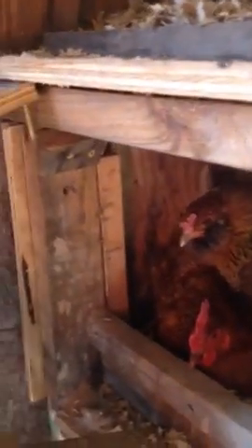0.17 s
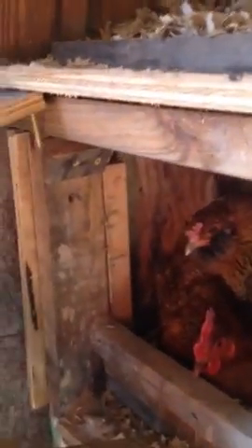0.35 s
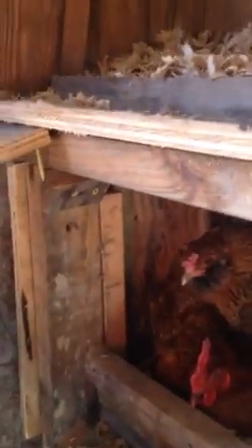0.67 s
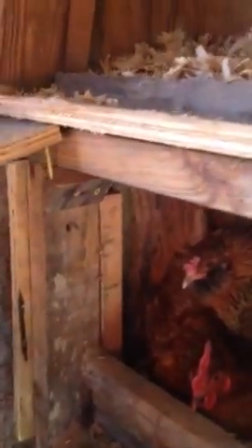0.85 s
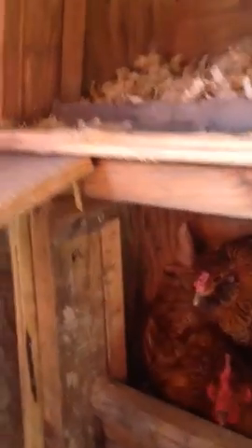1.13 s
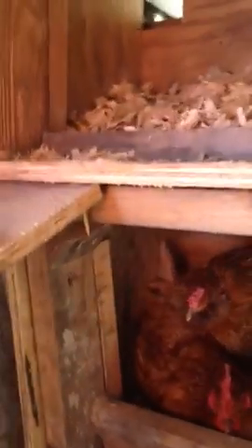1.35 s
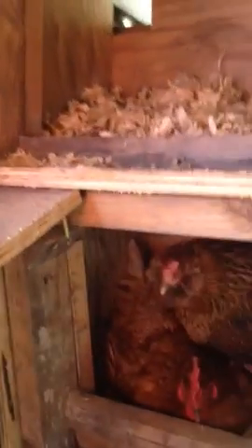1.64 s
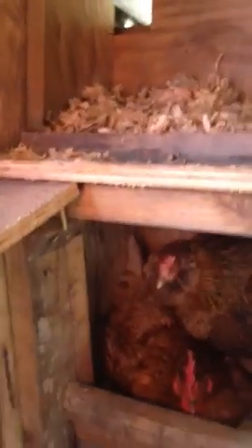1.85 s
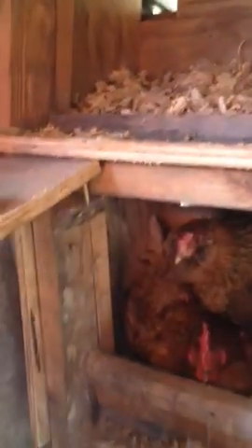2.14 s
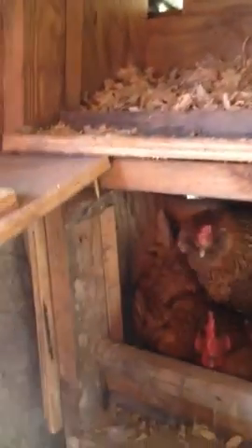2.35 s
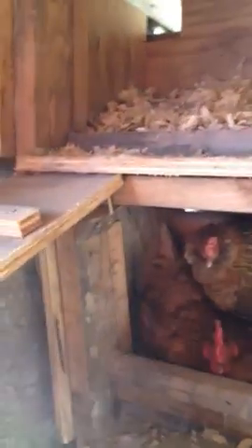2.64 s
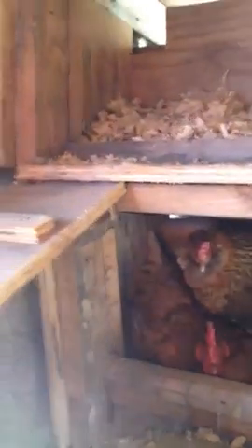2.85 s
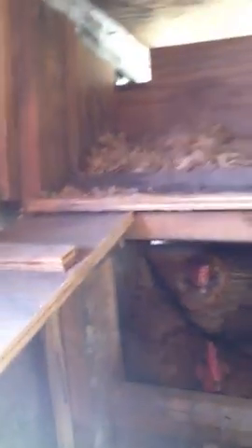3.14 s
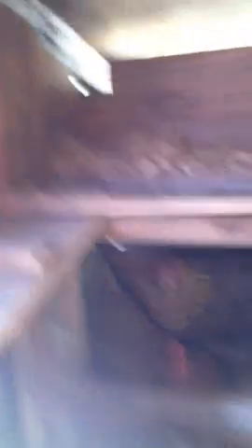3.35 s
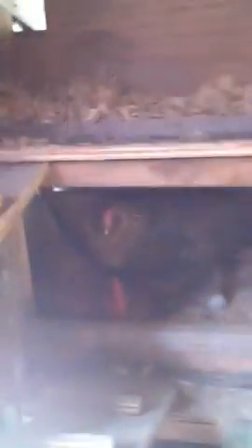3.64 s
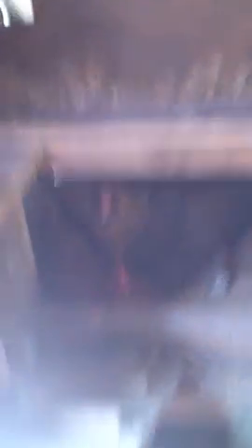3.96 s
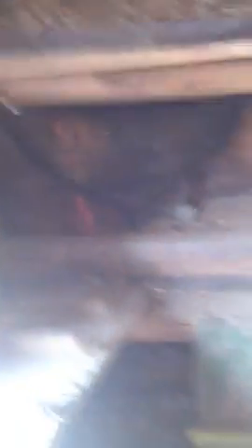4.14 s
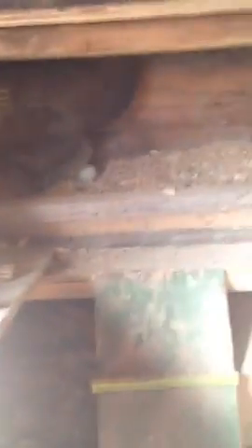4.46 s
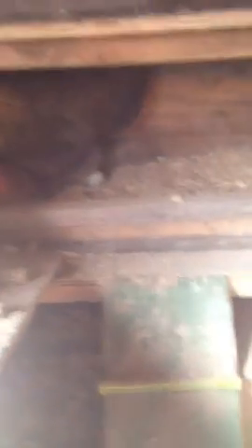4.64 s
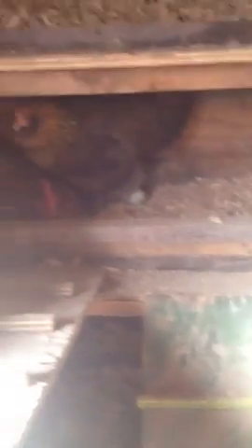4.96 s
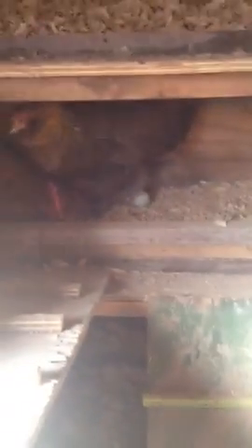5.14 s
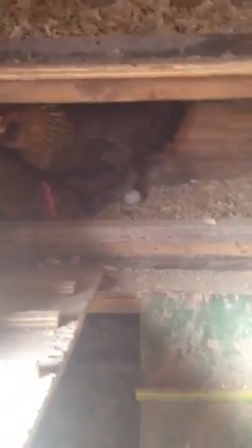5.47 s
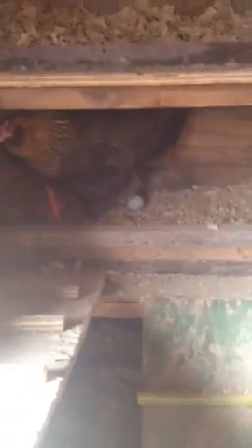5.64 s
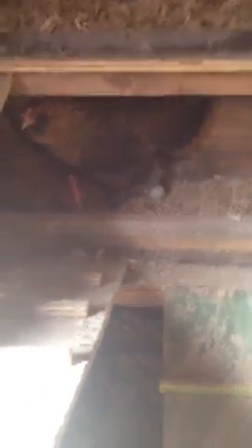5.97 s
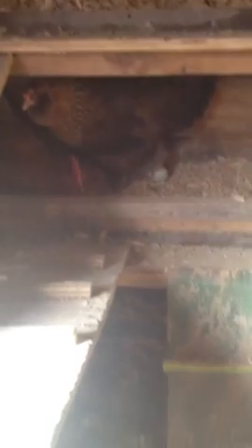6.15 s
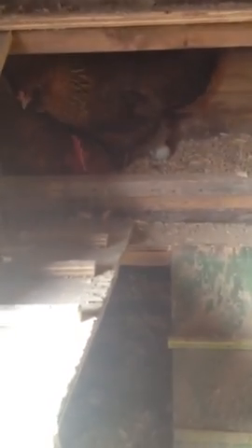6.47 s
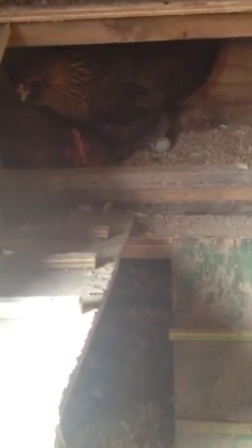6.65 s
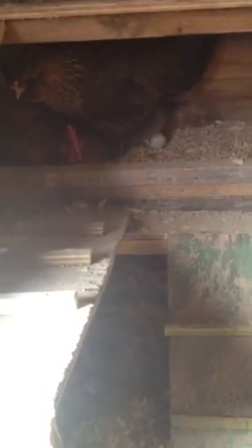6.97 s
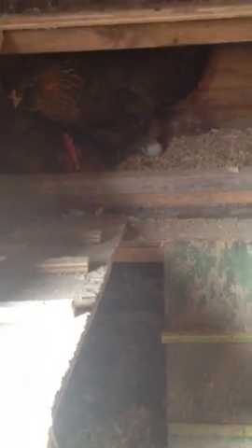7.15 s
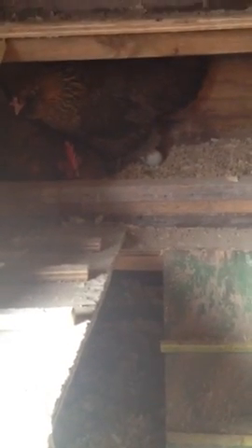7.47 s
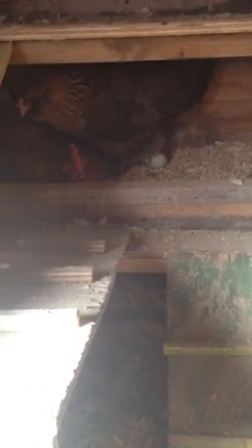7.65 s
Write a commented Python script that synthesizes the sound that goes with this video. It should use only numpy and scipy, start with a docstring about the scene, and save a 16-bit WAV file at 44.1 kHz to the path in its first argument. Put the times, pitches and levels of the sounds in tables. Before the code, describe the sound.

A quiet start holds low outdoor rumble, thin hiss and faint crackles of dry shavings. Two very soft clucks come at about 1.2 and 1.3 s, then a loud squawk from 1.4 to 1.8 s, arching, dipping, then held and cracking into hoarseness. Firmer clucks follow from 1.9 to 2.5 s amid rustling bedding and small handling ticks, with a soft peep-like tick near 2.7. From 3.2 to 4.2 s a hand rubs and knocks the microphone, the hardest knocks around 3.75 and 3.9. Clucks resume at 3.7 and run evenly, about five a second, until 5.1. A second loud squawk lasts from 5.3 to 5.65 s, rough and splitting into two notes. The small wooden coop rings briefly. Then it is quiet: a faint rub at 6.1, a tiny tap at 7.3 and a thin, faraway bird whistle at 7.6 s.

```python
"""A hen in a wooden nest box clucks in runs, about five a second, and twice breaks into a loud squawk.
Each call is a train of pulses from her closing membranes, coloured by throat and beak; under strain it
drops an octave, splits into two notes or turns hoarse. The small coop rings briefly around her.
Shavings crackle in filtered grains of noise; close at the microphone a hand rubs and knocks the camera
with damped rings and clicks, and the same recipe gives one soft, short peep-like tick.
Far off lie a low outdoor rumble, thin hiss and, near the end, one faint whistled bird note."""
import sys
import numpy as np
from scipy import signal
from scipy.io import wavfile
from scipy.ndimage import uniform_filter1d

SR = 44100
rng = np.random.default_rng(int(sys.argv[2]) if len(sys.argv) > 2 else 0)


def persist_wave(psi):
    """Save psi, clipped to +-1, as 16-bit WAV."""
    counts = np.round(np.clip(psi, -1, 1) * 32767).astype(np.int16)
    wavfile.write(sys.argv[1], SR, np.atleast_2d(counts).T)


N = 344421
TIME = np.arange(N) / SR

# Distant outdoor rumble and thin hiss, spectra: f/Hz, relative level/dB
RUMBLE_SPECTRUM = [(25, -44.5), (50, -32.5), (85, -6.5), (130, -1.5), (186, 2), (360, -2.5), (450, -5),
                   (560, -20), (1500, -29), (3000, -78)]
AIR_SPECTRUM = [(60, -18), (600, -5), (1000, -14.5), (2100, -20.5), (9000, -27.5), (15300, -29)]
# Slow course of the rumble: t/s, level/dB before the trim in outdoors()
RUMBLE_COURSE = [(0, -66), (.7, -68.5), (2.2, -58), (3.5, -52.5), (5.6, -54.5), (7.8, -57.5)]
# Reverberation of the coop: f/Hz, time to die by 60 dB/s
COOP_DECAY = [(200, 0.22), (1000, 0.14), (3000, 0.15), (12000, 0.05)]
# Round trips between the walls of the nest box: t/s
WALL_TRIPS = [.0007, .0013, .0023]

# Crackle of dry wood shavings: f/Hz, relative level/dB
SHAVINGS_SPECTRUM = [(60, -22), (900, 2.5), (2100, 0.5), (4000, -7.5), (7500, -10.5), (11000, -19),
                     (15000, -19)]
# Hens shifting in the shavings: peak t/s, half length/s, level/dB
SHUFFLES = [(0.228, 0.065, -65), (0.987, 0.0663, -60.5), (1.211, 0.224, -59.5), (1.82, .045, -54.5),
            (2.156, 0.0262, -55), (2.327, 0.0099, -52), (2.674, 0.026, -62.5), (4.55, 0.114, -67.5)]
SETTLING_DB = -72.5  # faint crackle that never stops

# Hand on the camera, pressed hard, brushing lightly, and its hiss: f/Hz, relative level/dB
RUB_FIRM = [(50, -58.5), (330, -1), (520, 2), (900, -3.5), (2200, -6), (4400, -16.5), (6000, -38),
            (9000, -46.5)]
RUB_LIGHT = [(50, -43.5), (600, -4), (1400, -6), (2300, 1.5), (3400, 1), (4500, -9.5), (5500, -24),
             (9000, -47.5)]
RUB_HISS = [(3000, -44), (6500, 7.5), (10000, -4), (15000, -4)]
# Strokes of the hand: start t/s, length/s, rub level/dB, hiss level/dB, firm press 0 to light brush 1
STROKES = [(3.219, 0.0548, -52, -68.5, 0.15), (3.403, 0.1307, -37, -55, 0.137),
           (3.56, 0.047, -50, -53, .14), (3.596, 0.0298, -39.5, -52, 0.093),
           (3.725, 0.0186, -30.5, -43, 0.276), (3.793, 0.0498, -52.5, -63.5, 0.156),
           (3.961, 0.0482, -45.5, -60.5, 0.313), (4.009, 0.0575, -41, -60.5, 0.866),
           (4.099, 0.1409, -40.5, -59, 0.848), (5.042, 0.0635, -51.5, -86.5, 0.485),
           (6.089, 0.0705, -52, -79.5, 0.384)]
GRIP_S, SLIP_S, PRESS_DB = 0.0116, 0.024, 8.5  # a stroke takes hold, grows by PRESS_DB, then dies away
# Knocks on the camera body, and at 2.665 s one soft, short peep-like tick:
# t/s, peak of the ring level/dB, ring f/Hz, click against the ring level/dB
KNOCKS_AND_TICK = [(2.207, -39, 535, -8), (2.438, -39.5, 700, 8), (2.59, -41.5, 495, -28),
                   (2.665, -40, 1672, -23), (3.380, -35, 493, -17), (3.423, -48.5, 456.6, 14),
                   (3.515, -32.5, 798, 7.5), (3.530, -30, 486, -7), (3.645, -22.5, 703, -8),
                   (3.746, -14.5, 628, 7), (3.762, -23.5, 272.8, -12), (3.877, -37.5, 266, -6.5),
                   (3.928, -26, 162, -16.5), (3.932, -20, 542, 1.5), (4.021, -42, 850, 11),
                   (4.225, -33.5, 504, 4), (7.263, -69, 298.6, 0)]
# Sharp click that goes with each ring: f/Hz, relative level/dB
CLICK_SPECTRUM = [(60, -66), (300, -25.5), (1000, -6.5), (2300, 12), (3300, 8.5), (5000, -5.5),
                  (8000, -11.5), (15000, -36)]

# Throat with open beak in squawks one and two, and nearly shut for clucks: f/Hz, relative level/dB
THROAT_1 = [(80, -57), (320, -11), (600, -5.5), (950, 4), (1230, 4), (1700, -15), (2200, 0.5),
            (2620, -25.5), (3050, -5), (3550, -16.5), (4000, -37), (5200, -23), (6200, -20), (8000, -25),
            (8800, -37.5), (9900, -26.5), (11000, -40.5), (15000, -35.5)]
THROAT_2 = [(80, -48), (300, -10), (420, -20.5), (620, -6.5), (760, -6), (950, 2), (1080, 6.5),
            (1300, -0.5), (1720, -18), (2120, -7), (2850, -11), (3500, -47.5), (4300, -18), (5000, -27),
            (6100, -24.5), (7200, -35.5), (7950, -21), (9300, -42), (12000, -31), (15000, -40.5)]
THROAT_SHUT = [(70, -43.5), (320, -4), (520, -13.5), (750, 3), (920, -1), (1090, 3.5), (1380, -20),
               (1850, -15), (2150, -14.5), (2500, -42.5), (3700, -46), (4900, -40.5), (7300, -65.5),
               (8150, -49), (9200, -70.5), (15000, -56.5)]
TURN_S = 3.6  # clucks from here on open towards the second squawk's colour
# Clucks: peak t/s, level/dB, pitch at the peak f/Hz, length/s, beak opening 0-1
CLUCKS = [(1.16, -39.5, 319, 0.0121, 0), (1.344, -40.5, 326.2, 0.0088, 0.01),
          (1.892, -27.5, 324, 0.02115, 0.7), (1.903, -19.5, 495.9, 0.0122, 0.69),
          (2.077, -28, 300.1, .023, 0.49), (2.265, -31, 288.7, 0.02487, 0.16),
          (2.510, -28, 458.2, 0.02106, 0.42), (3.721, -34.5, 346.5, 0.01517, 0.37),
          (3.935, -31, 370.3, 0.0226, 0.36), (4.151, -30, 390.6, 0.01994, 0.26),
          (4.344, -27.5, 366.4, 0.023, 0.41), (4.537, -26.5, 355.3, 0.01917, 0.36),
          (4.735, -29, 363.3, 0.0221, 0.38), (4.926, -28.5, 362.9, 0.0215, 0.38),
          (5.117, -29, 357.8, .022, 0.5)]
CLUCK_RISE, CLUCK_ROUGH = .45, 0.15  # share of the length spent swelling; roughness 0-1
CLUCK_CLIMB, CLIMB_S = .17, .017  # upward glide: share of the pitch either side of the peak, and its time
# Pitch of each squawk, a short arch, a dip and a long held note: t/s, f/Hz
PITCH_1 = [(1.44, 459), (1.472, 584.4), (1.498, 623.6), (1.524, 508.9), (1.558, 494.1), (1.6, 665.4),
           (1.62, 621.6), (1.75, 629), (1.787, 463)]
PITCH_2 = [(5.261, 491), (5.28, 539.5), (5.295, 647.7), (5.36, 636), (5.395, 696.1), (5.438, 523.6),
           (5.455, 545.5), (5.47, 725.9), (5.495, 603), (5.6, 633.9), (5.652, 484.4)]
# Spells in which the strained voice breaks: start t/s, end t/s, weakening of every second pulse 0-1,
# added roughness 0-1, extra effort level/dB
BREAKS = [(1.611, 1.75, 0.5, 0.07, 3), (1.744, 1.805, 0.29, 0.6, 1), (5.346, 5.431, 0.23, .1, 1.5),
          (5.475, 5.551, 0.25, .28, -1.5), (5.534, 5.66, 0.2, .62, -0.5)]
BREAK_S = .015  # the voice slips into and out of a break this fast
CLEAN_ROUGH, ONSET_ROUGH, SETTLE_S = 0.058, 0.5, .01  # a squawk starts rough, then settles
ATTACK_S, RELEASE_S = 0.014, 0.03696
BRIGHT_HZ, BRIGHTEN = 3800, .45  # above this the treble gains an extra share of each dB of effort
HOARSE_DULL_DB = -4  # treble change at full roughness
# A second pair of membranes sings its own note in the second squawk
SECOND_START_S, SECOND_END_S, SECOND_HZ = 5.476, 5.615, 843.4
SECOND_DB, SECOND_PULL, SECOND_WAVER = -17.5, .7, .025  # level before the throat, chopping depth, unsteadiness

EDGE_HZ = 15350  # upper limit of the microphone chain


def amp(db):
    """Decibels to gain."""
    return 10 ** (np.asarray(db) / 20)


def unit(x):
    """Scales to rms 1."""
    return x / np.sqrt(np.mean(x ** 2) + 1e-20)


def read(points, hz):
    """A table over frequency, read on a log-frequency axis."""
    f, value = np.transpose(points)
    return np.interp(np.log(hz + 1), np.log(f + 1), value)


def follow(rows, t):
    """The columns of a curve table at times t."""
    s, *columns = np.transpose(rows)
    return [np.interp(t, s, c) for c in columns]


def add(mix, s, sound):
    """Mixes a sound in at time s."""
    part = mix[round(s * SR):][:len(sound)]
    part += sound[:len(part)]


def spell(t, start, end, edge_s):
    """1 between start and end, with straight ramps just inside."""
    return np.clip(np.minimum(t - start, end - t) / edge_s, 0, 1)


def colour(x, spectrum, other=None, share=0, size=4096):
    """Causal minimum-phase filter with the given spectrum, shifted by a share towards another one."""
    hz = abs(np.fft.fftfreq(size, 1 / SR))
    db = read(spectrum, hz)
    if other:
        db = db + share * (read(other, hz) - db)
    response = np.exp(np.conj(signal.hilbert(np.log(amp(db)))))
    ring = np.fft.ifft(response).real[:size // 2]
    return signal.oaconvolve(x, ring)[:len(x)]


def noise(spectrum, grain_db=0, grains_per_s=900):
    """Coloured noise of rms 1, broken into short grains of uneven size."""
    sizes = np.minimum(rng.exponential(1, N), 4)
    grain = sizes[(TIME * grains_per_s).astype(int)]
    return unit(colour(rng.standard_normal(N) * amp(grain_db * grain), spectrum))


def outdoors(rumble_trim_db=-0.5, air_db=-65):
    """Far outside: low filtered noise that slowly rises and falls, under a thin steady hiss."""
    rumble_db = follow(RUMBLE_COURSE, TIME)[0] + rumble_trim_db
    return amp(rumble_db) * noise(RUMBLE_SPECTRUM) + amp(air_db) * noise(AIR_SPECTRUM)


def far_bird(s=7.62, length_s=0.13, hz=3600, db=-68, waver=0.0078):
    """One thin whistled note from outside, a wavering sine that swells and fades."""
    t = np.arange(0, length_s, 1 / SR)
    drift = unit(uniform_filter1d(rng.standard_normal(len(t)), size=200))
    pitch = hz * (1 + waver * drift)
    swell = np.sin(np.pi * t / length_s)
    out = np.zeros(N)
    add(out, s, amp(db) * swell * np.sin(2 * np.pi * np.cumsum(pitch) / SR))
    return out


def coop(x, size=16384):
    """Dense echoes between close plywood walls, each band dying at its own speed."""
    signs, present = rng.choice([-1., 1.], size), rng.random(size) < 3000 / SR  # some 3000 echoes/s
    taps = signs * present * (np.arange(size) > 100)
    hz, t, bands = signal.stft(taps, SR, nperseg=256)
    decay = amp(-60 * t / read(COOP_DECAY, hz)[:, None])
    tail = signal.istft(bands * decay, SR, nperseg=256)[1]
    return signal.oaconvolve(x, tail / np.linalg.norm(tail))[:N]


def bedding():
    """Dry shavings crackle as the hens shift: grainy noise that swells with each shuffle."""
    stir = amp(SETTLING_DB)
    for s, half, db in SHUFFLES:
        stir = stir + amp(db) * np.exp(-((TIME - s) / half) ** 2)
    return stir * noise(SHAVINGS_SPECTRUM, grain_db=2.5, grains_per_s=320)


def hand():
    """Fingers rub over the camera in short strokes, each pressing harder until it slips off."""
    firm, brush = noise(RUB_FIRM, grain_db=1.5), noise(RUB_LIGHT, grain_db=2.0)
    hiss = noise(RUB_HISS, grain_db=2.0)
    out = np.zeros(N)
    for start, length, rub_db, hiss_db, light in STROKES:
        age = TIME - start
        grip = np.clip(age / GRIP_S, 0, 1)
        press = amp(PRESS_DB * (np.clip(age / length, 0, 1) - 1))
        slip = np.exp(-np.maximum(age - length, 0) / SLIP_S)
        rub = (1 - light) * firm + light * brush
        out += grip * press * slip * (amp(rub_db) * rub + amp(hiss_db) * hiss)
    return out


def knocks_and_tick(ring_s=0.002364, click_s=0.000367, size=1500):
    """A click and a heavily damped ring: the camera body when knocked, and once a soft peep-like tick."""
    out, t = np.zeros(N), np.arange(size) / SR
    for s, db, hz, click_db in KNOCKS_AND_TICK:
        motion = np.sin(2 * np.pi * hz * t) * t * np.exp(-2 * t / ring_s)
        ring = np.gradient(motion)  # pressure follows the change of motion
        click = colour(rng.standard_normal(size) * np.exp(-t / click_s), CLICK_SPECTRUM)
        pulse = ring / abs(ring).max() + amp(click_db) * click / abs(click).max()
        add(out, s, amp(db) * pulse)
    return out


def nest_box(x, beam_hz=3900, bounce=0.5):
    """Low notes come straight out; the beamed treble arrives scattered by the walls of the box."""
    x = signal.sosfilt(signal.butter(2, 120, "high", fs=SR, output="sos"), x)
    low = signal.sosfiltfilt(signal.butter(10, beam_hz, fs=SR, output="sos"), x)
    treble = x - low
    for trip_s in WALL_TRIPS:
        echo = np.r_[1, np.zeros(int(trip_s * SR)), bounce]
        treble = signal.lfilter(echo[::-1], echo, treble)  # all-pass: smears the pulses, keeps their energy
    return low + treble


def syrinx(t, hz, doubling, rough, jitter=0.13, wander=0.081, shimmer=0.45, lag=0.18, breath=0.24):
    """One pulse each time the membranes close; strain makes the pulses alternate, then lurch and stumble."""
    lurch = unit(signal.oaconvolve(rng.standard_normal(len(t)), signal.windows.hann(500), "same"))
    turns = np.cumsum(hz * np.exp(wander * rough * lurch)) / SR
    count = np.arange(1, int(turns[-1]))
    at = np.interp(count, turns, np.arange(len(t)))  # closing moments, in samples
    i, odd = at.astype(int), count % 2
    early, strong = rng.standard_normal((len(at), 2)).T
    # every second pulse comes late and weak, which sounds the octave below
    at = at + (jitter * rough[i] * early + lag * doubling[i] * odd) * SR / hz[i]
    height = (1 - np.clip(doubling[i], 0, 1) * odd) * np.exp(shimmer * rough[i] * strong)
    # band-limited pulses placed between samples
    offset = np.arange(len(t))[:, None] - at
    pulses = (np.sinc(offset) * (abs(offset) < 16)) @ height
    puffs = np.exp(-2 * (turns % 1)) * rng.standard_normal(len(t))  # air escapes in each cycle
    return unit(pulses) + (.05 + breath * rough) * unit(puffs)


def second_voice(t, pulses):
    """An unrelated wavering note that chops the main pulses into sum and difference tones."""
    waver = unit(signal.oaconvolve(rng.standard_normal(len(t)), signal.windows.hann(1000), "same"))
    tone = np.cos(2 * np.pi * np.cumsum(SECOND_HZ * (1 + SECOND_WAVER * waver)) / SR)
    tone = tone * spell(t, SECOND_START_S, SECOND_END_S, BREAK_S)
    return pulses * (1 + SECOND_PULL * tone) + amp(SECOND_DB) * tone


def cluck(s, db, hz, length, opening):
    """A few pulses through a briefly parted beak, climbing in pitch."""
    rise, fall = length * CLUCK_RISE, length * (1 - CLUCK_RISE)
    t = np.arange(-2 * rise, 2 * fall, 1 / SR)
    pitch = hz * (1 + CLUCK_CLIMB * np.tanh(t / CLIMB_S))
    swell = np.exp(-np.where(t < 0, abs(t / rise) ** 2.6, (t / fall) ** 2))
    flat = np.ones(len(t))
    pulses = syrinx(t, pitch, 0 * flat, CLUCK_ROUGH * flat, jitter=.25, breath=.5)
    open_throat = THROAT_1 if s < TURN_S else THROAT_2
    voice = unit(colour(pulses, THROAT_SHUT, open_throat, opening))
    return s + t[0], amp(db) * swell * voice


def squawk(pitch, throat, level_db, db_per_octave, swell_db_per_s):
    """A long strained call through the open beak; effort follows the pitch and drifts as the call goes on."""
    t = np.arange(pitch[0][0], pitch[-1][0], 1 / SR)
    hz, age = follow(pitch, t)[0], t - t[0]
    effort_db = db_per_octave * np.log2(hz / np.median(hz)) + swell_db_per_s * (age - age.mean())
    doubling, rough = 0 * t, CLEAN_ROUGH + ONSET_ROUGH * np.exp(-age / SETTLE_S)
    for start, end, weakening, hoarse, push_db in BREAKS:
        broken = spell(t, start, end, BREAK_S)
        doubling = doubling + weakening * broken
        rough = rough + hoarse * broken
        effort_db = effort_db + push_db * broken
    pulses = second_voice(t, syrinx(t, hz, doubling, rough))
    call = unit(colour(pulses, throat))
    # effort brightens the call, hoarseness dulls it
    treble = signal.sosfiltfilt(signal.butter(2, BRIGHT_HZ, "high", fs=SR, output="sos"), call)
    call = call + (amp(BRIGHTEN * effort_db + HOARSE_DULL_DB * rough) - 1) * treble
    envelope = np.minimum(age / ATTACK_S, 1) * np.minimum((t[-1] - t) / RELEASE_S, 1) ** 2
    return t[0], amp(level_db + effort_db) * envelope * call


def hen():
    """The clucks and the two squawks, all from the same pulsing voice."""
    out = np.zeros(N)
    for row in CLUCKS:
        add(out, *cluck(*row))
    add(out, *squawk(PITCH_1, THROAT_1, level_db=-17.5, db_per_octave=16.5, swell_db_per_s=5))
    add(out, *squawk(PITCH_2, THROAT_2, level_db=-17.0, db_per_octave=2.5, swell_db_per_s=1.5))
    return out


def scene(coop_db=-11):
    """Hen and bedding sound in the coop; handling, tick and outdoors are added without its echoes."""
    nest = nest_box(hen()) + bedding()
    inside = nest + amp(coop_db) * coop(nest)
    return (inside + hand() + knocks_and_tick() + outdoors() + far_bird())[None]


def record(dry):
    """The microphone chain passes nothing much above its upper limit: a steep low-pass."""
    band_limit = signal.firwin(511, EDGE_HZ, window=("kaiser", 9), fs=SR)
    return signal.oaconvolve(dry, band_limit[None], "same")


dry = scene()
out = record(dry)
persist_wave(out)
```